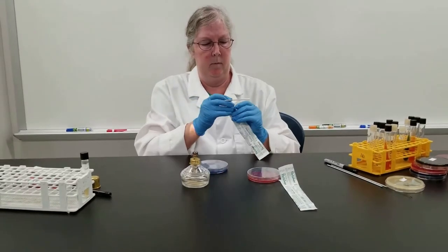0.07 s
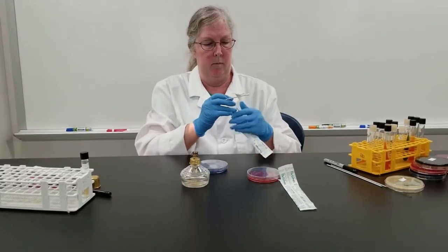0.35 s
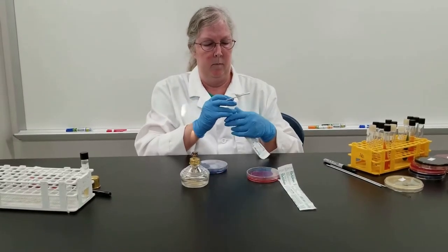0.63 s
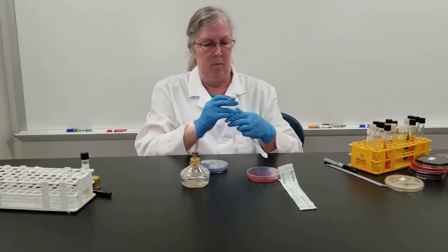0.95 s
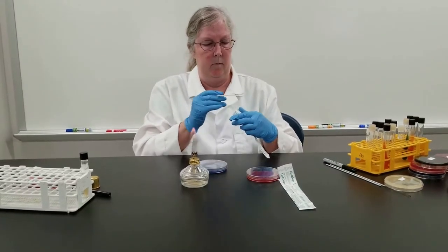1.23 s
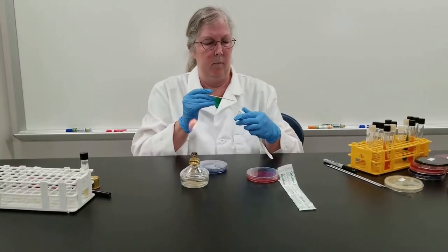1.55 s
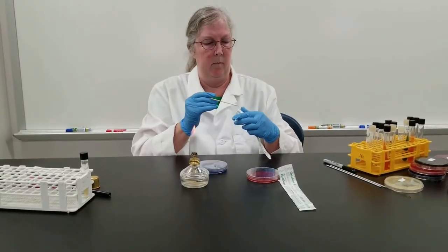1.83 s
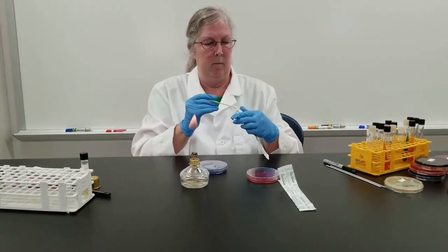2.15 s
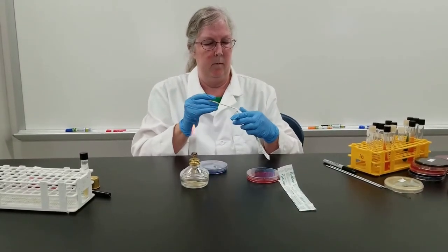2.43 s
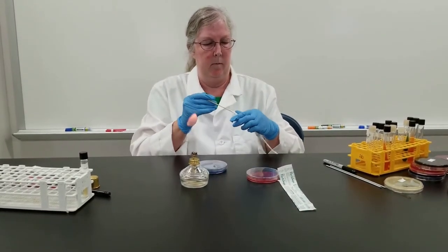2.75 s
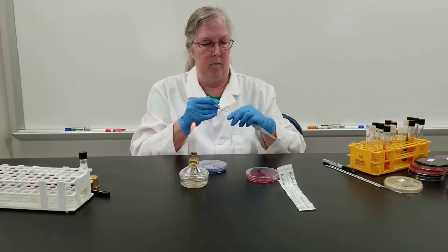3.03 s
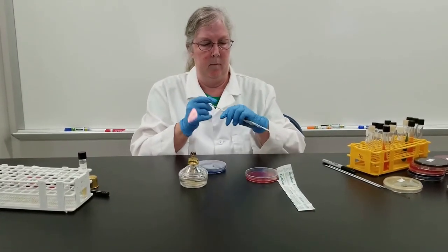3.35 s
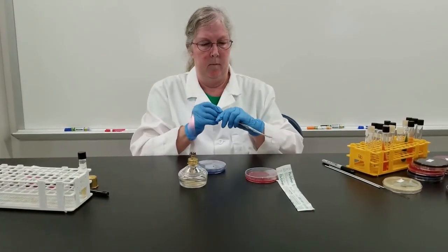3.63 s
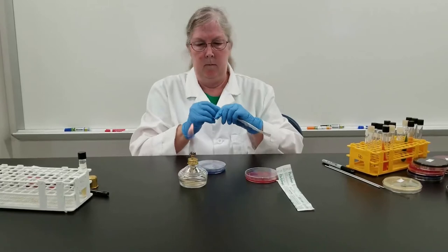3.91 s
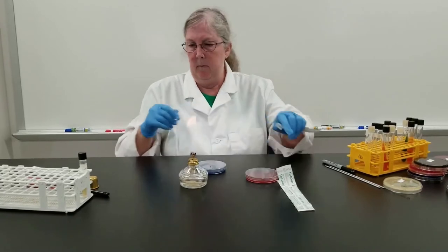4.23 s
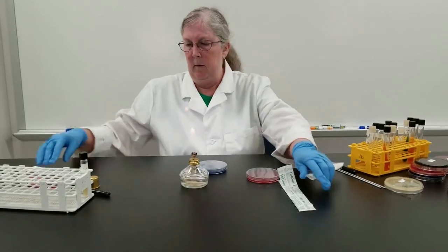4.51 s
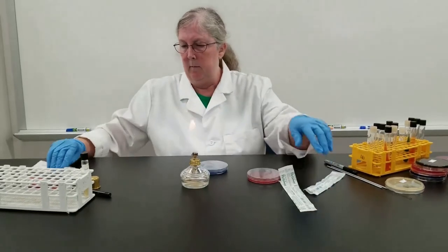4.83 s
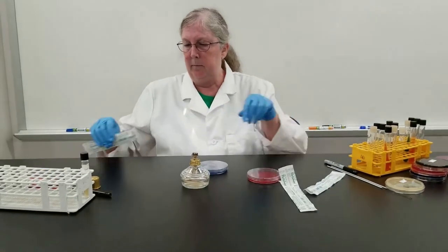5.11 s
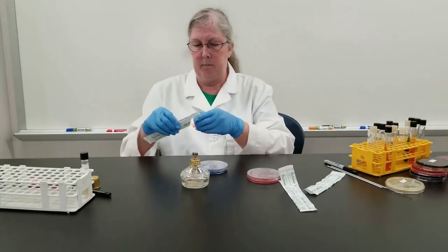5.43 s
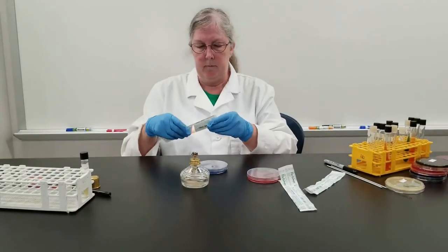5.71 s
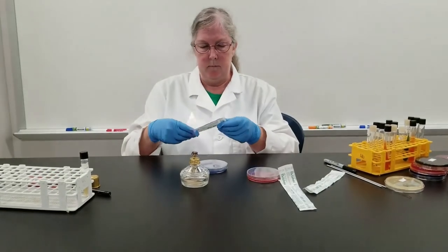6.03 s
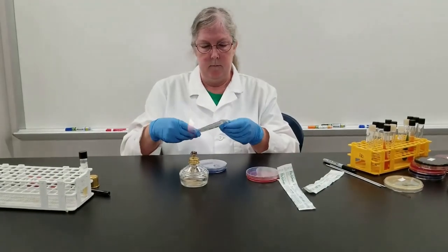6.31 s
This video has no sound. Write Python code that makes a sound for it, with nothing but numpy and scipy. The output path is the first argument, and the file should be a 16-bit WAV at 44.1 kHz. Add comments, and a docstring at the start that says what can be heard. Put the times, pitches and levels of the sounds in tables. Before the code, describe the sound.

Stiff paper wrapper crinkles, rips open in three short pulls, then taps and rustles over low ventilation in a small room.

```python
"""Peeling open a paper wrapper

At a laboratory bench, gloved hands peel open the stiff wrapper of a swab, lay it down and pick up another.
Three pulls rip the seam, swelling as tension builds; between them the paper is rubbed and turned.
It buckles in sharp snaps over a rustle of fibre slips, and taps hollowly on a rack as it is picked up.
A small hard room answers every snap; ventilation rumbles underneath."""
import sys
import numpy as np
from scipy import signal
from scipy.fft import rfft, irfft
from scipy.io import wavfile
from scipy.ndimage import uniform_filter1d, map_coordinates

SR = 44100
rng = np.random.default_rng(int(sys.argv[2]) if len(sys.argv) > 2 else 0)


def to_wav(s):
    """Save 16-bit WAV."""
    ch = np.atleast_2d(s).T  # columns
    pcm = np.round(np.clip(ch, -1, 1) * 32767)  # PCM
    wavfile.write(sys.argv[1], SR, pcm.astype(np.int16))


N = 289296

# Levels are relative. "Body" is the gain of the sheet's lows, "fizz" that of the fibres' highs.
# buckling creases: t/s, level/dB, body/dB, fizz/dB, facet resonance f/Hz, its height/dB, room send/dB
CREASES = [(0.0371, -31, -13, 5, 6740, 12.5, 0.5), (0.2158, -20, -6, -10, 1760, 9, -6.5),
           (0.3402, -22, 2.5, 15, 7900, 5.5, -18), (0.4186, -21, 4, 2, 9000, 4, -11),
           (0.464, -39.5, 18, 4, 7200, 20, 0.5), (0.5511, -32, -4, 13, 7500, 13, 3),
           (0.6299, -29.5, 3, -4, 7140, 7, -10), (0.6825, -17.5, -3.5, 2, 9100, 10.5, -4),
           (0.6882, -19.5, -15, 4, 3100, 14, -13), (0.7061, -24.5, -7, -7, 8000, 6, -9),
           (0.7307, -20.5, -7.5, -22, 8000, -2, -3), (0.8741, -21.5, 2.5, -7, 6850, 12, -5),
           (0.906, -13.5, -5, -4.5, 9200, 6, -5.5), (0.913, -16.5, -1.5, -5, 8050, 5, -17),
           (0.9233, -18, -5, -17, 5000, -6, -13), (3.0158, -3.5, -35, -2, 7100, 3, -14),
           (3.0267, 8.5, -24, -1.5, 7400, 4.5, -13), (3.029, -3, -30, -11, 2340, 22, 6),
           (3.0531, -6.5, -4.5, -2, 9000, 6, -9), (3.1633, -17, -8, -12, 5800, 14, -11),
           (3.17, -11.5, -8, 3, 2330, 13, 4), (3.195, -19, -24, 23, 5060, 19, -25),
           (3.204, -11.5, 2, -0.5, 10150, 24, -6), (3.2113, 0.5, -11.5, -2, 4280, 8.5, -16),
           (3.2322, -15, -9, 3, 4420, 13, -20), (3.5184, -14.5, -3, 11.5, 5200, 11, 5.5),
           (3.5583, -12.5, 5, 16.5, 11500, 1, -3.5), (3.5635, -15, -11, 18.5, 9000, 9, -15),
           (3.5743, -11, 0.5, 1, 11400, 7, -21), (3.5799, -13, -11, 16, 6300, 8, -28),
           (3.777, -18.5, -6, -2, 5350, 3, -10), (3.7954, -13.5, 2, 6, 1760, 12, -37),
           (3.8255, -6.5, -8.5, -14, 1770, 8, -29), (3.939, -17.5, -6, -14, 6400, 11, -8),
           (4.0737, -15, -19, -20.5, 3530, 11, -3), (4.559, -21, -6, 2, 7100, 7, 2),
           (4.5853, -4, -4, 1, 6500, 3, -4.5), (4.772, -29.5, 0, 1, 7040, 20, -5),
           (4.7828, -10.5, 2.5, 19, 6700, 9, -6), (4.7861, -25.5, -6, 5.5, 4340, 25.5, 10.5),
           (4.8244, -10, -6, -0.5, 9800, 15, 5), (4.829, -14.5, -18, 14, 9000, 6, -11),
           (5.1749, -13.5, 7.5, 17.5, 6800, 9.5, -4.5), (5.3295, -44.5, 0.5, 16.5, 13600, 15, -5.5),
           (5.495, -18, -2, 1, 6640, 8.5, -1.5), (5.616, -23.5, -14, -10, 8000, 3, 3),
           (5.6307, -25.5, 1, 5, 5500, 5, -6), (5.7389, -27, 11.5, 14, 5000, 9, 1),
           (5.7625, -15.5, 4.5, 7.5, 4600, 7, -2.5), (5.7741, -26.5, 22, 4, 9200, 11, -18),
           (5.812, -26.5, -3, -14, 4350, 6, -1), (5.863, -40, 23, 13, 4420, 18, -1),
           (5.8988, -7.5, -4, 11.5, 5400, 8, -6), (6.1968, -18.5, 4, -0.5, 2160, 17.5, 1),
           (6.3928, -23, 14, 3.5, 6240, 24, -2)]
# spectrum of the paper: f/Hz, level/dB
PAPER_SPECTRUM = [(250, -28), (480, -30.5), (750, -16), (1300, -14.5), (1900, -10.5), (2900, -9.5),
                  (4400, -2.5), (5400, -1), (6200, -3), (7500, 1), (9000, -9), (15500, -10)]
# bands the folded wrapper beams forward or cancels: f/Hz, width/Hz, gain/dB
DIRECTIVITY = [(1270, 100, -8.5), (1670, 110, 10.5), (2965, 380, -8.5), (5170, 210, 8), (6070, 1400, -5),
               (8650, 390, -6)]
# pulls that peel the seam: start t/s, duration/s, slack level/dB
SEAM_PULLS = [(3.016, 0.23, -44), (3.489, 0.083, -38), (3.787, 0.01, -41.5)]
# paper rubbing on gloves, itself or the bench: middle t/s, duration/s, level/dB, body/dB, fizz/dB
PAPER_RUBS = [(0.01, 0.05, -58.5, -15, 3), (0.166, 0.11, -62.5, -5, -2), (0.374, 0.14, -52, -1.5, 6.5),
              (0.632, 0.046, -60, 10.5, 9), (0.72, 0.08, -53, -1.5, 4.5), (0.923, 0.079, -53.5, -1, 2),
              (1.153, 0.7, -75.5, 3, 7), (1.622, 0.076, -70, -11, 12), (2.366, 0.06, -75, -5, 3),
              (2.621, 0.04, -64, -23, 14), (2.702, 0.056, -60, 6, 8), (2.819, 0.047, -53, 9.5, 11),
              (2.883, 0.16, -55.5, -10, 1), (3, 0.04, -44.5, -19, -5), (3.046, 0.057, -39, 1.5, 10),
              (3.264, 0.098, -47, -6, -3), (3.65, 0.078, -59, -13, -10), (3.704, 0.015, -43.5, -1, -1),
              (3.798, 0.031, -38, -3, -12), (3.866, 0.08, -60, -16, -20), (3.985, 0.15, -57, -2.5, -2),
              (4.369, 0.12, -62, 0, 5.5), (4.602, 0.062, -53.5, 12, -10), (4.728, 0.27, -53, -8, 6),
              (4.834, 0.12, -43.5, -6, 15), (4.903, 0.04, -44, 12, 8), (4.926, 0.0083, -34, 6, 1),
              (5.222, 0.045, -58, 3, 17), (5.587, 0.12, -55, 2, 5), (5.712, 0.093, -53, -5, 12.5),
              (5.911, 0.13, -54, 3, 3), (6.089, 0.084, -63.5, 8.5, 7), (6.238, 0.064, -60, 5.5, -9),
              (6.457, 0.17, -70, 6, 8)]
# the paper merely held: level/dB, body/dB, fizz/dB
HELD_PAPER = (-82, 11, 8.6)
# paper pops, glove thumps and a faint squeak: t/s, level/dB, centre f/Hz, width/Hz
SOFT_HANDLING = [(0.215, -23, 2440, 600), (.343, -19.5, 650, 250), (.418, -27, 2220, 500),
                 (.63, -24, 583, 200), (0.691, -16, 3600, 900), (0.877, -20.5, 1840, 350),
                 (1.332, -29, 1840, 120), (2.69, -26.5, 850, 250), (2.81, -33, 920, 252),
                 (3.03, -1, 3180, 890), (3.203, -13.5, 785, 300), (3.25, -26, 1900, 450),
                 (3.798, -6, 1990, 350), (3.815, -8.5, 2600, 884), (4.587, -10, 3360, 805),
                 (5.774, -21, 1130, 300), (5.899, -10, 1980, 500), (6.198, -13.5, 2820, 990)]
# the wrapper's edge skipping over the rack: t/s, level/dB
RACK_TAPS = [(4.772, -26), (4.785, -19.5), (4.825, -14), (4.857, -28), (4.877, -16.5), (4.893, -15),
             (4.918, -18.5), (4.933, -26)]
# hollow modes of the tapped wrapper: f/Hz, level/dB, T60/s
WRAPPER_MODES = [(720, -4.5, 0.053), (768, -3.5, 0.049), (897, 0, 0.025), (1090, 1, 0.019),
                 (1514, 3.5, 0.017), (2720, -12, 0.023)]
# position of the paper: t/s, lead of the left channel/ms, left minus right/dB
PAPER_POSITION = [(0, 0.021, 0), (3.6, 0.016, -1.5), (4.55, 0.017, 0.5), (4.75, 0.35, -1),
                  (4.95, 0.26, 3.5), (5.2, 0.093, 2), (5.9, 0.011, 0), (6.4, 0.023, 2)]
# shadowing, mostly of the right side: f/Hz, left minus right/dB
SIDE_SHADOW = [(500, 1), (1300, 2.5), (2400, 4.5), (5000, -4), (8000, 12), (12000, 9.5)]
# phase lag from the right microphone's housing: f/Hz, lag/rad
HOUSING_LAG = [(1000, 0), (2500, 0.0097), (4500, 0.31), (7000, 0.77), (12000, 0.23)]
# first echoes from bench and body: delay/ms, left gain, right gain
EARLY_ECHOES = [(1.586, 0.092, 0.27), (6.27, 0.33, 0.091), (7.29, 0.067, 0.3), (12.43, 0.18, 0.1),
                (27.8, 0.038, 0.015)]
# reverberation time: f/Hz, T60/s
REVERB_TIME = [(500, 0.17), (1300, 0.29), (3500, 0.47), (8000, 0.59), (15000, 0.33)]
# colour of the reverberation: f/Hz, gain/dB
REVERB_SPECTRUM = [(500, 3), (2000, 0), (4500, -2.46), (7500, -7.5), (10000, -4), (15000, -0.8)]
# spectral density of the background, ventilation rumble and faint hiss: f/Hz, level/dB
NOISE_SPECTRUM = [(12, -64.5), (20, -14), (48, -1.5), (86, -6), (158, 1), (204, -11), (293, -13),
                  (434, -26.5), (698, -31.5), (759, -32), (1810, -34.5), (2260, -34), (6720, -38.5),
                  (7730, -41.5), (16000, -35.5)]
# a low hum peak, a dip, and the microphone's resonance near 7.6 kHz: f/Hz, width/Hz, height/dB
NOISE_PEAKS = [(100, 5.9, 3.5), (140.4, 11, -4), (7600, 1500, 6.5)]
# likeness of the background in the two channels: f/Hz, correlation
NOISE_CORRELATION = [(60, 0.91), (180, 0.9), (550, 0.46), (1650, -0.11), (4970, -0.48), (15000, 0.73)]
# balance of the background: f/Hz, left minus right/dB
NOISE_BALANCE = [(60, 0.33), (300, 0.95), (700, .7), (15000, 0.56)]


def crease_snaps(snap_ms=1.25, level_db=1, ring_log_width=0.15, room_ring=0.64, uneven_db=3, size=1024):
    """Buckling: a crease gives way in a burst that rings one facet. Returns direct sound and room feed."""
    hz = np.fft.rfftfreq(size, 1 / SR)
    direct, feed = np.zeros(N), np.zeros(N)
    beam_db = peaks_db(DIRECTIVITY, hz)
    knots_hz = np.geomspace(500, 16000, num=30)
    for start, db, body_db, fizz_db, ring_hz, height_db, room_db in CREASES:
        ring_db = height_db / (1 + (np.log((hz + 1) / ring_hz) / ring_log_width) ** 2)
        colour_db = level_db + db + paper_db(hz, body_db, fizz_db)
        fold_shape = rng.uniform(-1.17, 1, len(knots_hz))  # no two folds are alike
        ripple_db = uneven_db * np.interp(hz, knots_hz, fold_shape)
        push = burst(snap_ms)
        forward = minimum_phase(gain_of(colour_db + ring_db + beam_db + ripple_db))
        to_room = minimum_phase(gain_of(colour_db + room_ring * ring_db + room_db))
        add(direct, start, signal.fftconvolve(push, forward))
        add(feed, start, signal.fftconvolve(push, to_room))
    return direct, feed


def burst(length_ms, size=2048):
    """Impulsive excitation: a short swell of noise, partly whitened, of unit energy."""
    age = np.arange(size) / SR * 2400 / max(length_ms, 0.2)  # in time constants
    noise = rng.standard_normal(size) * age * np.exp(-age)
    whitener = minimum_phase(abs(rfft(noise)).clip(1e-6) ** -0.6)
    flat = signal.fftconvolve(noise, whitener)[:size]
    return flat / np.linalg.norm(flat)


def paper_db(hz, body_db, fizz_db, body_hz=2500, fizz_hz=9000, bass_hz=200):
    """Radiation spectrum of paper: the whole sheet gives the lows, single fibres the highs."""
    lows = 1 / (1 + (hz / body_hz) ** 4)
    highs = 1 - 1 / (1 + (hz / fizz_hz) ** 6)
    rolloff_db = 20 * np.log10((hz + 1) / np.hypot(hz, bass_hz))
    return at_hz(PAPER_SPECTRUM, hz) + body_db * lows + fizz_db * highs + rolloff_db


def rustle(crackle_db=-5, patchy_db=3, level_db=-1, size=256):
    """Source and filter: slips and crackles drive facets whose resonances shift as the paper bends."""
    fibres = slips(per_s=5000, spread_db=0.5)
    crackles = gain_of(crackle_db) * slips(per_s=90, spread_db=3)
    frames = dict(fs=SR, nperseg=size, noverlap=size * 3 // 4)
    hz, t, spectra = signal.stft(fibres + crackles, **frames)
    strength, body_db, fizz_db = handling(t)
    facets = uniform_filter1d(rng.standard_normal(spectra.shape), size=4, axis=0)  # smooth in frequency
    facets = unit_rms(uniform_filter1d(facets, size=10, axis=1))  # and in time
    spectra *= unit_rms(gain_of(patchy_db * facets))
    spectra *= gain_of(paper_db(hz[:, None], body_db, fizz_db))
    sound = signal.istft(spectra, **frames)[1][:N]
    return sound * gain_of(level_db) * np.interp(np.arange(N) / SR, t, strength)


def slips(per_s, spread_db):
    """Stick-slip friction: a Poisson train of impulses, a few larger than the rest."""
    sizes = gain_of(spread_db * np.minimum(rng.exponential(1, N), 4))
    signs = rng.choice([-1., 1.], N)
    slipping = rng.random(N) < per_s / SR
    return unit_rms(sizes * signs * slipping)


def handling(t):
    """Incoherent sources add in power: total amplitude, with body and fizz weighted by power."""
    moves = [pull(t, *row) for row in SEAM_PULLS] + [rub(t, *row) for row in PAPER_RUBS]
    moves.append(np.outer(HELD_PAPER, np.ones(len(t))))
    db, body_db, fizz_db = np.swapaxes(moves, 0, 1)
    power = gain_of(db) ** 2
    return (np.sqrt(power.sum(0)),
            np.average(body_db, axis=0, weights=power),
            np.average(fizz_db, axis=0, weights=power))


def pull(t, start, length, db, swell_db=7, attack_s=0.01, release_s=0.015):
    """Peeling: as tension builds, the rip swells and more of the sheet sounds while the fizz recedes."""
    tension = np.clip((t - start) / length, 0, 1) ** 2.05
    fade_nepers = np.maximum(start - t, 0) / attack_s + np.maximum(t - start - length, 0) / release_s
    level_db = db + swell_db * tension - 20 * np.log10(np.e) * fade_nepers
    body_db = -9.5 * (1 - tension)
    fizz_db = 4.5 - 4 * tension
    return level_db, body_db, fizz_db


def rub(t, middle, length, db, body_db, fizz_db, edge_drop_db=8, roundness=1.43):
    """Sliding friction: the level of a stroke rises and falls while its colour holds."""
    level_db = db - edge_drop_db * abs(2 * (t - middle) / length) ** roundness
    return np.broadcast_arrays(level_db, body_db, fizz_db)


def soft_handling(length_ms=3, size=2048):
    """Band-limited transients: paper pops, glove thumps and a faint squeak, each in one narrow band."""
    hz, out = np.fft.rfftfreq(size, 1 / SR), np.zeros(N)
    for start, db, centre_hz, width_hz in SOFT_HANDLING:
        band = gain_of(db) / np.sqrt(1 + (2 * (hz - centre_hz) / width_hz) ** 4)
        add(out, start, signal.fftconvolve(burst(length_ms), minimum_phase(band)))
    return out


def rack_taps(uneven_db=3, level_db=-12, attack_s=0.00025, lowest_hz=560):
    """Modal ringing: each tap lands elsewhere and shares its energy differently among damped modes."""
    t, out = np.arange(SR // 10) / SR, np.zeros(N)
    hz, mode_db, t60 = np.transpose(WRAPPER_MODES)[:, :, None]
    for start, db in RACK_TAPS:
        coupling = rng.standard_normal(hz.shape)
        modes = gain_of(mode_db + uneven_db * coupling - 60 * t / t60) * np.sin(2 * np.pi * hz * t)
        ring = (np.sign(coupling) * modes).sum(0) * (1 - np.exp(-t / attack_s))
        add(out, start, gain_of(db + level_db) * ring / np.linalg.norm(ring))
    return signal.sosfilt(signal.butter(4, lowest_hz, "high", fs=SR, output="sos"), out)


def direct_paths(x, scatter_db=-3.5, scatter_hz=4000, scatter_s=0.0013, size=512):
    """Interference: direct sound, first echoes and treble scattered by the paper meet at two points."""
    n, hz = np.arange(N), np.fft.rfftfreq(N, 1 / SR)
    times, *position = np.transpose(PAPER_POSITION)
    lead_ms, pan_db = [np.interp(n / SR, times, column) for column in position]
    paths = 1 + sum(np.array([[left], [right]]) * np.exp(-2j * np.pi * hz * ms / 1000)
                    for ms, left, right in EARLY_ECHOES)
    scatter = rng.standard_normal((2, size)) * np.exp(-n[:size] / SR / scatter_s)
    scatter = rfft(scatter / np.linalg.norm(scatter, axis=1, keepdims=True), N)
    scatter_gain = gain_of(scatter_db) * hz / np.hypot(hz, scatter_hz)
    paths = (paths + scatter_gain * scatter) / np.hypot(1, scatter_gain)
    paths[1] *= np.exp(-1j * at_hz(HOUSING_LAG, hz))
    left, right = irfft(rfft(x) * paths * panned(at_hz(SIDE_SHADOW, hz)), N)
    right = map_coordinates(right, [n - lead_ms * SR / 1000], order=5)  # fractional delay
    return np.array([left, right]) * panned(pan_db)


def turning_reverb(x, fades_per_s=6, count=4):
    """Directional excitation: as the paper turns, its sound fades between sets of reflections."""
    turn = fades_per_s * np.arange(N) / SR
    offsets = [abs((turn - k + count / 2) % count - count / 2) for k in range(count)]
    return sum(reverb(x * np.cos(np.pi / 2 * np.minimum(offset, 1))) for offset in offsets)


def reverb(x, gap_s=0.0011, shadow_share=0.29, bass_correlation=0.23, correlated_hz=2500, size=256):
    """Diffuse field: dense random reflections, each band decaying at its own rate."""
    reflections = rng.standard_normal((2, SR)) * (rng.random((2, SR)) < 0.1)
    reflections *= np.arange(SR) > gap_s * SR
    hz, t, spectra = signal.stft(reflections, SR, nperseg=size)
    correlation = bass_correlation / (1 + (hz / correlated_hz) ** 2)
    spectra = correlated(*spectra, correlation[:, None])
    spectra *= gain_of(-60 * t / at_hz(REVERB_TIME, hz)[:, None])
    norm = np.linalg.norm(signal.istft(spectra, SR, nperseg=size)[1][0])
    colour = gain_of(at_hz(REVERB_SPECTRUM, hz)) * panned(shadow_share * at_hz(SIDE_SHADOW, hz))
    tail = signal.istft(spectra * colour[:, :, None], SR, nperseg=size)[1] / norm
    return signal.fftconvolve(x[None], tail, axes=1)[:, :N]


def background(rms_db=-64.5):
    """Stationary noise: ventilation rumble, a low hum, and hiss brightened by microphone resonance."""
    hz = np.fft.rfftfreq(N, 1 / SR)
    noise = correlated(*rfft(rng.standard_normal((2, N))), at_hz(NOISE_CORRELATION, hz))
    shape_db = at_hz(NOISE_SPECTRUM, hz) + peaks_db(NOISE_PEAKS, hz)
    pair = irfft(noise * gain_of(shape_db) * panned(at_hz(NOISE_BALANCE, hz)), N)
    return gain_of(rms_db) * pair / pair.mean(0).std()


def gain_of(db):
    """Decibels to amplitude ratio."""
    return 10 ** (np.asarray(db) / 20)


def unit_rms(x):
    """Normalisation to unit mean power."""
    return x / np.sqrt(np.mean(x ** 2) + 1e-20)


def at_hz(points, hz):
    """Interpolation on a log-frequency axis."""
    f, value = np.transpose(points)
    return np.interp(np.log(hz + 1), np.log(f + 1), value)


def peaks_db(peaks, hz):
    """A sum of Lorentzian peaks and dips."""
    return sum(db / (1 + (2 * (hz - f) / width) ** 2) for f, width, db in peaks)


def add(mix, start_s, sound):
    """Superposition of a sound from a given time on."""
    part = mix[max(round(start_s * SR), 0):][:len(sound)]
    part += sound[:len(part)]


def panned(db):
    """Constant-power panning: left and right gains for a level difference."""
    pair = np.array([gain_of(db / 2), gain_of(-db / 2)])
    return pair / np.sqrt((pair ** 2).mean(0))


def correlated(a, b, correlation):
    """Partial coherence: two independent noises mixed into a correlated pair."""
    return np.array([a, correlation * a + np.sqrt(1 - correlation ** 2) * b])


def minimum_phase(gain):
    """Hilbert relation: the causal impulse response with the sharpest attack for a given spectrum."""
    log_gain = np.log(np.maximum(gain, 1e-5))
    mirrored = np.r_[log_gain, log_gain[-2:0:-1]]
    return np.fft.ifft(np.exp(np.conj(signal.hilbert(mirrored)))).real


def scene(rustle_room_db=-3, soft_direct_db=-6, tap_room_db=-5):
    """Superposition of the direct and reverberant fields over the background noise."""
    snaps, snap_feed = crease_snaps()
    rubbing, soft, taps = rustle(), soft_handling(), rack_taps()
    direct = snaps + rubbing + taps + gain_of(soft_direct_db) * soft
    feed = snap_feed + gain_of(rustle_room_db) * rubbing + gain_of(tap_room_db) * taps + soft
    return direct_paths(direct) + turning_reverb(feed) + background()


def record(dry, cutoff_hz=16150):
    """Band limiting by a linear-phase low-pass filter."""
    lowpass = signal.firwin(301, cutoff_hz, window=("kaiser", 9), fs=SR)
    return signal.oaconvolve(dry, lowpass[None], "same")


dry = scene()
out = record(dry)
to_wav(out)
```